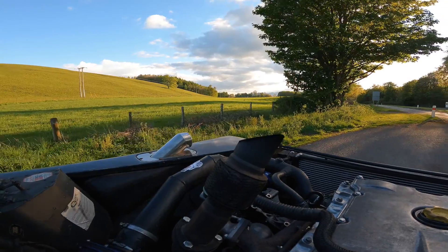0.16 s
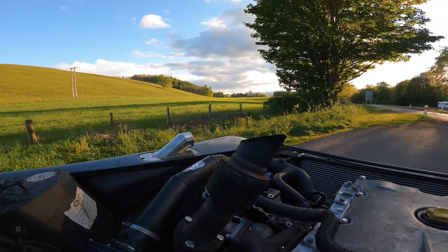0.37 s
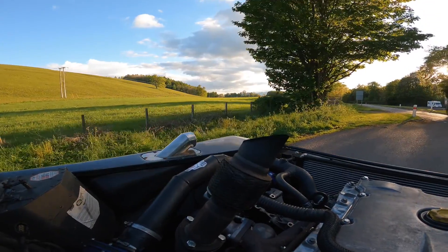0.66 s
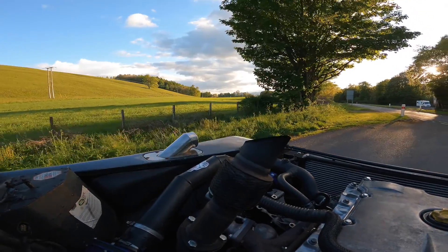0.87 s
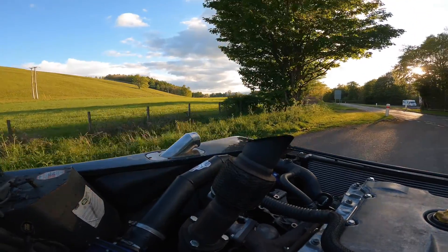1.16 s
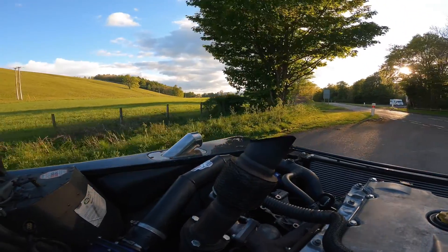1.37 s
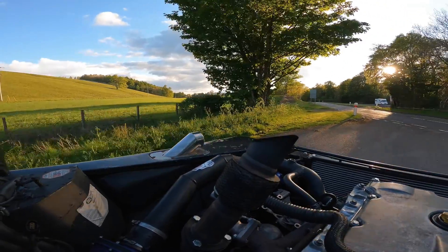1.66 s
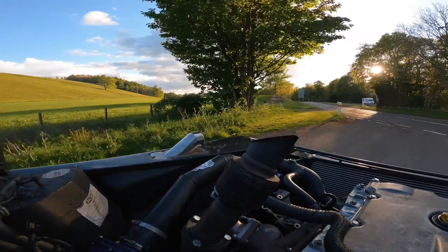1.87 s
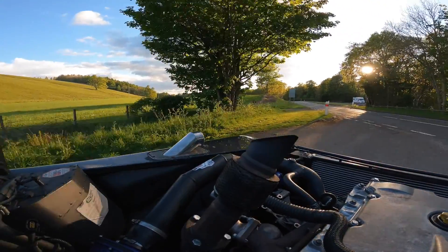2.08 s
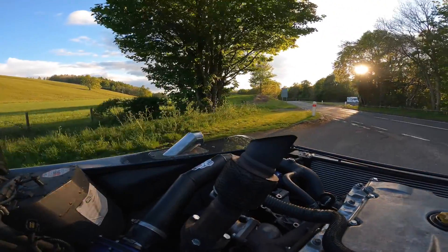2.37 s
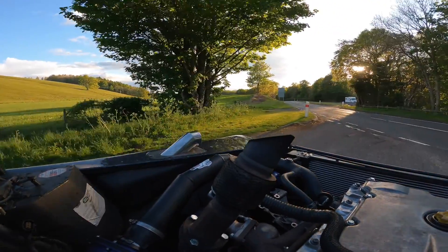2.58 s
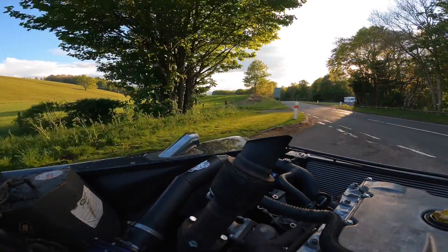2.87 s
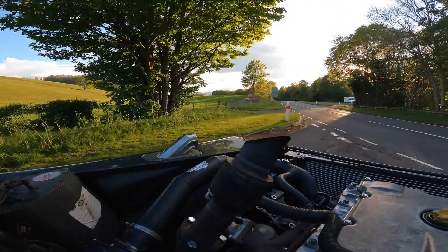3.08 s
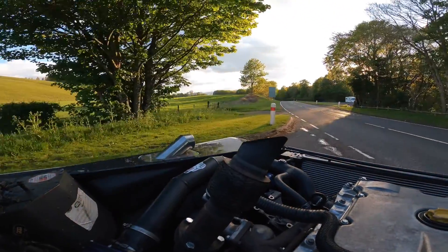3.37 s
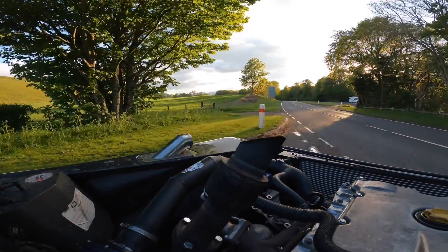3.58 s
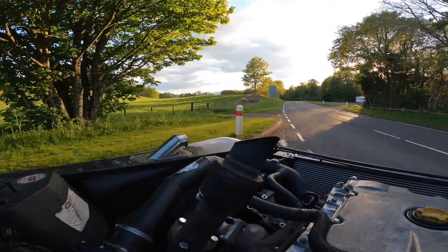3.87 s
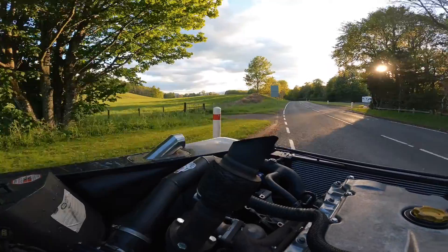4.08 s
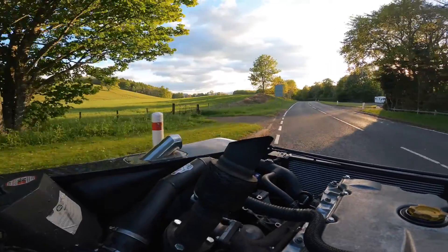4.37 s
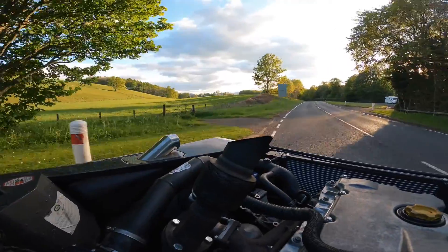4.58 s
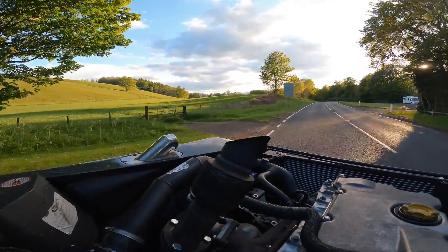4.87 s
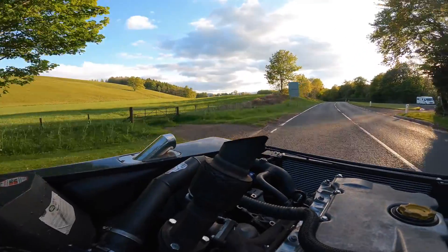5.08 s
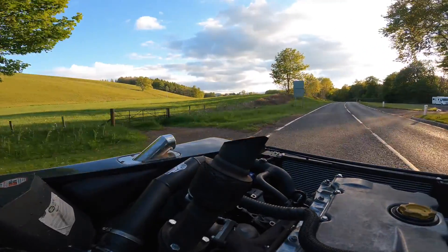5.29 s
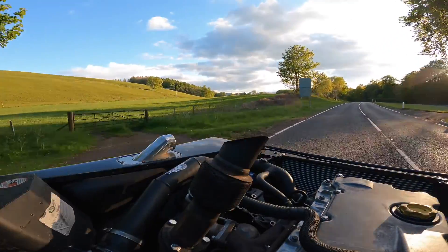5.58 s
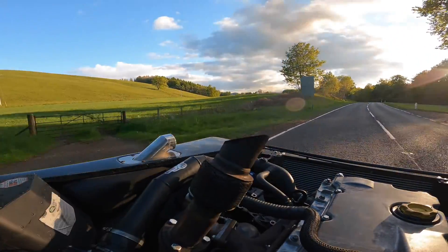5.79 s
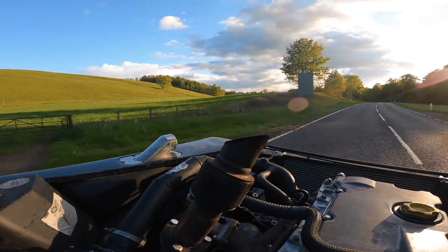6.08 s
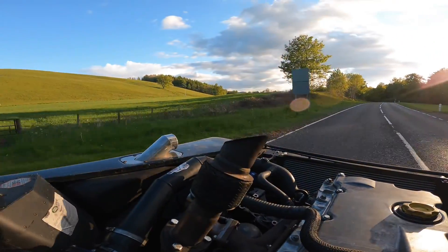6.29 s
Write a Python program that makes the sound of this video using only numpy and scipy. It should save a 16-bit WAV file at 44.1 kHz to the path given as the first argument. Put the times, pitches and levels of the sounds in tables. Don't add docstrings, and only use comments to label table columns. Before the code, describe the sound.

A microphone beside the engine of a vehicle on an open country road catches metallic diesel clatter, injector ticking and a soft whistle at idle. Load comes on; separate knocks blur into a coarse roaring drone as speed rises smoothly. The whistle slides up and thins into the treble, low wind rumbles on both sides, and a short rough lift-off ends it.

```python
import sys
import numpy as np
from scipy import signal
from scipy.fft import rfft, irfft
from scipy.io import wavfile

SR = 44100
rng = np.random.default_rng(int(sys.argv[2]) if len(sys.argv) > 2 else 0)


def waveform_to_disk(signal):
    frames = np.transpose(np.atleast_2d(signal))
    scaled = np.clip(frames, -1, 1) * 32767
    samples = np.round(scaled).astype(np.int16)
    wavfile.write(sys.argv[1], SR, samples)


def gain_from_db(level_db):
    decades = np.asarray(level_db, float) / 20
    return 10 ** decades


N = 284445
T = np.arange(N) / SR
EASE_OFF_S, EASE_OVER_S = 5.66, 0.28
LIFT_OFF_S = 6.225

# time in seconds, firing rate in Hz.
FIRING_RATE = [(0, 37.6), (.83, 37.5), (1.04, 41.8), (1.27, 44.5), (1.56, 51.3), (2.06, 62.6), (2.53, 72.3),
               (2.96, 79.2), (3.57, 88.3), (4.11, 98.6), (4.4, 104.3), (5.15, 121.2), (5.6, 133.2),
               (5.8, 141.3), (6.0, 146.8), (6.16, 153), (6.23, 151.6), (6.45, 143)]
CYLINDER_DB = [0.47, -0.95, 1.74, -1.2, 1.08]
ORDER_PHASE = [0, .8, 2.4, 2.8, -2.5]
# frequency of the multiple in Hz, level in dB.
PIPE_FIRST = [(37, -28.5), (45, -23), (51, -19.5), (62, -11.5), (100, -11), (122, -9), (150, -10.5)]
PIPE_SECOND = [(75, -13.5), (84, -13), (103, -12), (136, -23), (147, -21), (198, -15), (260, -22),
               (290, -20.5)]
PIPE_THIRD = [(112, -31.5), (125, -21.5), (154, -22), (200, -18.5), (248, -30), (312, -26.5), (365, -30.5),
              (450, -38.5)]
PIPE_FOURTH = [(150, -31.5), (180, -22.5), (205, -23), (290, -33), (355, -38.5), (395, -36), (490, -42)]
# firing rate in Hz, width in Hz, slip of multiples 2 and 3 in radians.
PIPE_SLIPS = [(40, 1, -.7, 0), (70, 4, 2.4, -.4), (105, 6, .3, 1), (136, 4, 2, 1.5)]
# time in seconds, knock level in dB, clatter level in dB.
COMBUSTION = [
    (0, -31, -26),
    (.85, -40, -25.5),
    (1.3, -28, -23.5),
    (2, -29.5, -22),
    (4, -29.5, -24),
    (5.7, -30, -21),
    (6.0, -39, -20.5),
    (6.45, -39, -24.5),
]
# frequency in Hz, width in Hz, gain in dB.
BLOCK_MODES = [
    (620, 41, 2),
    (1153, 85, 5),
    (1456, 300, -20.5),
    (1582, 78, 6.5),
    (2117, 39, 2),
    (2537, 116, -4.5),
    (5264, 200, -10.5),
    (7410, 460, -12.5),
]
# frequency in Hz, density in dB per Hz.
CLATTER_SPECTRUM = [(150, -12.5), (300, -6.5), (450, -15), (900, -13), (1500, -9.5), (2500, -13),
                    (3800, -16.5), (6000, -18.5), (9000, -22), (12500, -29), (13300, -33), (13900, -56),
                    (15200, -80)]
# frequency in Hz, width in Hz, gain in dB.
PANEL_MODES = [(1398, 31, 1), (3310, 200, -9.5), (910, 160, -5)]
# time in seconds, blade tone in Hz, level in dB.
BLADE_TONE = [(0, 2730, -34), (.55, 2592, -31.5), (1.15, 2608, -30.5), (1.5, 3037, -34.5),
              (2.08, 4100, -40.5), (2.38, 4630, -31), (2.65, 5230, -31.5), (3.0, 5380, -25.5),
              (3.4, 5620, -28.5), (4.25, 6620, -34), (4.5, 7330, -30.5), (4.9, 7730, -31.5),
              (5.25, 8623, -30.5), (5.6, 9100, -29.5), (5.8, 10400, -35), (6.17, 12900, -44),
              (6.26, 12500, -41), (6.45, 10200, -48)]
# frequency in Hz, width in Hz, gain in dB.
INTAKE_MODES = [(194.3, 45, -9), (249, 55, -11.5), (138, 74, -21)]
# frequency in Hz, level in dB.
LOPE_SPECTRUM = [(60, -22), (150, -5.5), (260, 11.5), (420, 0.5), (650, -3.5), (1000, -2), (1600, -32)]
# multiple of the firing rate, width in Hz, level in dB.
ROAR_BANDS = [(5.8, 140, 0.5), (9.1, 66, 2.5)]
# time in seconds, half length in seconds, change of the common
# part in dB, change of the differing part in dB.
BUFFETING_CHANGES = [
    (5.87, .06, 2, 4),
    (5.98, .06, 5, 6),
    (6.332, 0.17, 2.5, -35),
]
# frequency in Hz, level difference in dB.
LEFT_OVER_RIGHT = [(110, 0), (200, -1), (370, -2.5), (680, -1.5), (2300, -.6), (4250, -1.3), (9000, -.8),
                   (14400, -1.5)]
# frequency in Hz, level in dB.
PORT_DIFFERENCE = [(100, -36), (300, -41), (700, -15.5), (1500, -10.5), (3000, -8), (6500, -12.5),
                   (10000, -15.5), (13000, -3.5)]


def curves(table):
    s, *columns = np.transpose(table)
    return [np.interp(T, s, column) for column in columns]


def ramp(x, start, span):
    return np.clip((x - start) / span, 0, 1)


def eased(early_s=0):
    return ramp(T, EASE_OFF_S - early_s, EASE_OVER_S)


def unit(x):
    return x / np.sqrt(np.mean(x ** 2))


def colour(x, points):
    hz, db = np.transpose(points)
    f = np.fft.rfftfreq(N, 1 / SR) + 1
    return irfft(rfft(x) * gain_from_db(np.interp(np.log(f), np.log(hz), db)), N)


def ring(x, modes):
    total = 0
    for k, (hz, width, db) in enumerate(modes):
        b, a = signal.iirpeak(hz, hz / width, fs=SR)
        total = total + (-1) ** k * gain_from_db(db) * signal.lfilter(b, a, x)
    return total


def slow(hz):
    sos = signal.butter(2, hz, fs=SR, output="sos")
    return unit(signal.sosfilt(sos, rng.standard_normal(N)))


def firings(cycles, scatter_db):
    k = np.floor(cycles).astype(int) + 5
    scatter = scatter_db * rng.standard_normal(k.max() + 1)[k]
    strength = gain_from_db(np.array(CYLINDER_DB)[k % 5] + scatter)
    return strength, strength * np.diff(k, prepend=k[0])


def uneven_firings(cycles, scatter_db):
    clicks = firings(cycles, scatter_db)[1]
    return clicks - np.mean(gain_from_db(CYLINDER_DB)) * (clicks > 0)


def puff(cycles, sharp, steady):
    swell = np.exp(sharp * (np.cos(2 * np.pi * cycles) - 1))
    return steady + (1 - steady) * unit(swell)


def exhaust(hz, cycles):
    slip = np.zeros((4, N))
    for at, width, second, third in PIPE_SLIPS:
        passed = 1 / (1 + np.exp((at - hz) / width))
        slip[1] += second * passed
        slip[2] += third * passed
    tones = 0
    for k, db in enumerate(order_levels(hz)):
        phase = 2 * np.pi * (k + 1) * cycles + ORDER_PHASE[k] + slip[k]
        tones = tones + gain_from_db(db + 0.083 * slow(32)) * np.cos(phase)
    return np.sqrt(2) * tones


def order_levels(hz):
    cut_db = -24 * ramp(T, LIFT_OFF_S - .02, .02)
    stumble_db = -1.5 * np.exp(-((T - LIFT_OFF_S - 0.036) / 0.048) ** 2)
    levels = []
    for k, pipe in enumerate((PIPE_FIRST, PIPE_SECOND, PIPE_THIRD, PIPE_FOURTH)):
        f, db = np.transpose(pipe)
        level = np.interp(np.log((k + 1) * hz), np.log(f), db)
        levels.append(level + (cut_db if k else stumble_db))
    return levels


def block(hz, cycles):
    knock_db, clatter_db, tilt_db, steady = effort(hz)
    knocks = firings(cycles - .72 + .0078 * hz + .004 * slow(25), scatter_db=1.5)[1] / np.sqrt(hz)
    late = cycles - .78 + .0053 * hz
    strength = firings(late + .5, scatter_db=3)[0]
    gate = puff(late, 1.25, steady) * strength ** (.5 * (1 - steady))

    ticks = gate * valves(late) / np.sqrt(hz)
    low_ticks = colour(ticks, CLATTER_SPECTRUM[:5] + [(2500, -66)])
    ticks = unit(ring(ticks, BLOCK_MODES)) + 2.05 * unit(low_ticks)
    knock = gain_from_db(knock_db) * (casing(knocks, hz) + gain_from_db(-4) * unit(ticks))

    crisp = puff(late - .03, 2.2, np.sqrt(steady))
    treble = signal.butter(1, 3500, "high", fs=SR, output="sos")
    out = []
    for _ in range(2):
        sound = clatter(hz, gate)
        top = signal.sosfiltfilt(treble, sound)
        out.append(gain_from_db(clatter_db) * unit(sound + (gain_from_db(tilt_db) * crisp - 1) * top))
    return knock + out[0], out[1] + np.roll(knock, 23)


def effort(hz):
    tilt_db = -6.5 + 3.5 * ramp(hz, 59, 22.2) - 5 * eased()
    idle, fast, lifted = 0.43, 0.74, 0.83
    steady = idle + (fast - idle) * ramp(hz, hz[0], 64)
    steady += (lifted - fast) * ramp(T, EASE_OFF_S, LIFT_OFF_S - EASE_OFF_S)
    return *curves(COMBUSTION), tilt_db, np.clip(steady, 0, 1)


def clatter(hz, gate):
    hiss, rattle = gate * rng.standard_normal((2, N)) * gain_from_db(1.36 * slow(163))
    sound = unit(colour(hiss, CLATTER_SPECTRUM))
    sound += 0.62 * (1 - 0.36 * eased()) * casing(rattle, hz)
    sound += (hz / 140) ** 6 * 4.1 * ring(rattle, PANEL_MODES)
    sound += (45 / hz) ** 0.4 * 7 * ring(rattle, BLOCK_MODES[6:])
    sound += (gain_from_db(-2.5 * eased()) - 1) * colour(sound, [(5760, -40), (7260, 0)])
    return sound


def valves(cycles):
    k = np.floor(8 * cycles).astype(int) + 40
    return rng.standard_normal(40)[k % 40] * np.diff(k, prepend=k[0])


def casing(x, hz):
    return unit(ring_warming(x, BLOCK_MODES[:3], hz) + ring(x, BLOCK_MODES[3:6]))


def ring_warming(x, modes, hz):
    hot = ramp(hz, 40, 75)
    cold_ring = ring(x, np.array(modes) * [.955, 1, 1])
    hot_ring = ring(x, np.array(modes) * [1.045, 1, 1])
    return np.sqrt(1 - hot) * cold_ring + np.sqrt(hot) * hot_ring


def turbo(hz, cycles):
    tone_hz, db, octave_db, swing_hz, breathy = spool()
    late = cycles - .85 + 0.0044 * hz
    pitch_hz = tone_hz + 12 * slow(6) + swing_hz * np.sin(2 * np.pi * late)
    turn = 2 * np.pi * np.cumsum(pitch_hz) / SR
    steady = .3 + .2 * ramp(hz, 45, 25)
    gate = puff(late, 1.4, steady) * gain_from_db(1.3 * slow(10))
    breathy = np.clip(breathy, 0, 1)

    def tone(k):
        hiss = slow(380 * k) * np.cos(k * turn) + slow(350 * k) * np.sin(k * turn)
        pure = np.cos(k * turn + rng.uniform(0, 2 * np.pi))
        return np.sqrt(2 - 2 * breathy) * pure + np.sqrt(breathy) * hiss

    return [gain_from_db(db) * gate * (tone(1) + gain_from_db(octave_db) * tone(2)) for _ in range(2)]


def spool():
    tone_hz, db = curves(BLADE_TONE)
    octave_db = -8 - 2.6 * (tone_hz - tone_hz.min()) / 1000
    swing_hz = np.minimum(.047 * (tone_hz - 1800), 380)
    swing_hz = swing_hz * (1 - 0.65 * ramp(T, LIFT_OFF_S - .1, .1))
    breathy = 0.48 - .035 * (db - np.median(db))
    return tone_hz, db, octave_db, swing_hz, breathy


def intake(hz, cycles):
    uneven = uneven_firings(cycles, scatter_db=.7 * 38 / hz)
    pipe = ring(ring(uneven, [(600, 400, 0)]), [(640, 240, 0), (400, 200, -6)])
    pipe = gain_from_db(-35) * unit(hz ** .4 * pipe) * (1 - 0.47 * eased(.3))
    box = gain_from_db(-29.5) * unit(ring(uneven * 40 / hz, INTAKE_MODES))
    fifth = np.sqrt(2) * np.cos(2 * np.pi * 5 * cycles + ORDER_PHASE[4])
    fifth = fifth / (1 + ((5 * hz - 195) / 28) ** 4)
    return box + gain_from_db(-20.5) * fifth + pipe


def lope(hz, cycles):
    uneven = uneven_firings(cycles, scatter_db=0)
    load = ramp(hz, 43, 31) * (1 - .8 * eased(.2))
    return gain_from_db(-35.5) * load * unit(colour(uneven / np.sqrt(hz), LOPE_SPECTRUM))


def overrun(cycles):
    lifted = ramp(T, LIFT_OFF_S, 0.094)
    orders = gain_from_db(-30) * (np.cos(2 * np.pi * 11 / 5 * cycles) + np.cos(2 * np.pi * 16 / 5 * cycles))
    flutter = gain_from_db(-18) * slow(40) * np.sin(2 * np.pi * cycles)
    return lifted * (orders + flutter)


def roar(hz, cycles):
    on = ramp(hz, 119, 16) * (1 - 0.5 * ramp(T, LIFT_OFF_S, .15))
    bands = 0
    for order, width, db in ROAR_BANDS:
        turn = 2 * np.pi * order * cycles
        bands = bands + gain_from_db(db) * (slow(width) * np.cos(turn) + slow(width) * np.sin(turn))
    return gain_from_db(-33) * on * bands


def wind(hz):
    shape = [(20, -40), (60, 5), (150, 6.5), (400, 0), (900, -12), (2000, -31)]  # (Hz, dB)
    out = []
    for db in airflow(hz):
        buffeting = unit(colour(rng.standard_normal(N), shape))
        out.append(gain_from_db(db + 2 * slow(19)) * buffeting)
    return out


def airflow(hz):
    both_db = -67 + 20 * np.log2(hz / hz[0])
    apart_db = both_db - 0.5
    for s, half, both, apart in BUFFETING_CHANGES:
        gust = np.exp(-((T - s) / half) ** 2)
        both_db = both_db + both * gust
        apart_db = apart_db + apart * gust
    still = gain_from_db(-54)
    return both_db, 20 * np.log10(np.hypot(gain_from_db(apart_db), still))


def scene():
    hz, = curves(FIRING_RATE)
    cycles = np.cumsum(hz) / SR - .39
    knocking, whistle, air = block(hz, cycles), turbo(hz, cycles), wind(hz)
    mid = exhaust(hz, cycles) + knocking[0] + whistle[0]
    mid += intake(hz, cycles) + lope(hz, cycles) + overrun(cycles) + roar(hz, cycles) + air[0]
    side = colour(knocking[1] + whistle[1], PORT_DIFFERENCE) + air[1]
    left_lean = np.array(LEFT_OVER_RIGHT) * [1, .5]
    right_lean = np.array(LEFT_OVER_RIGHT) * [1, -.5]
    left = colour(mid, left_lean + [1, 0]) + side
    right = colour(mid, right_lean + [1, 0]) - side
    return np.array([left, right])


def low_pass(x):
    return signal.sosfilt(signal.butter(12, 14950, fs=SR, output="sos"), x)


def record(dry):
    rounded = np.tanh(0.58 * dry) / 0.65
    return low_pass(rounded)


dry = scene()
out = record(dry)
waveform_to_disk(out)
```